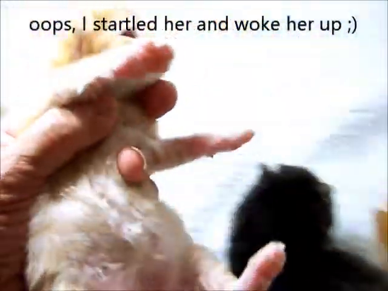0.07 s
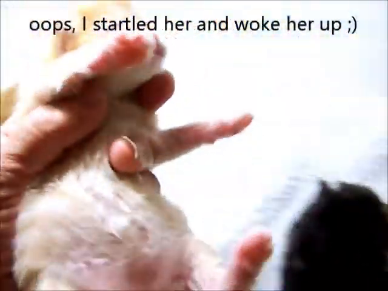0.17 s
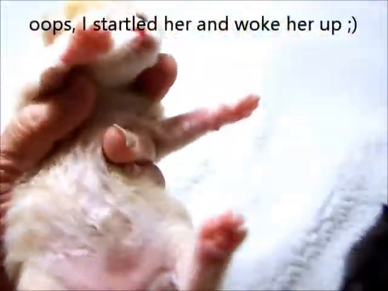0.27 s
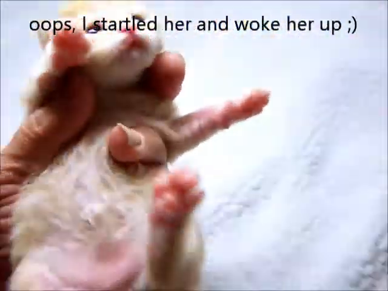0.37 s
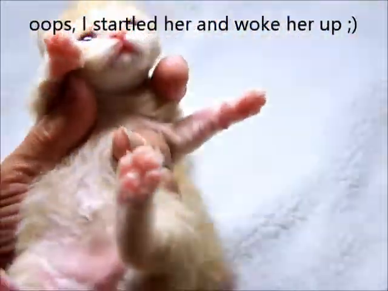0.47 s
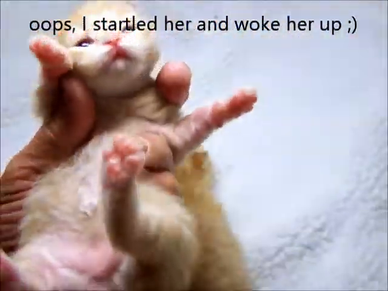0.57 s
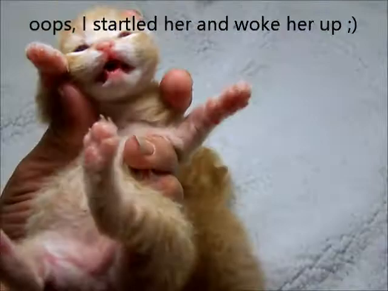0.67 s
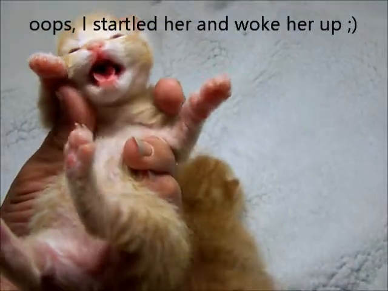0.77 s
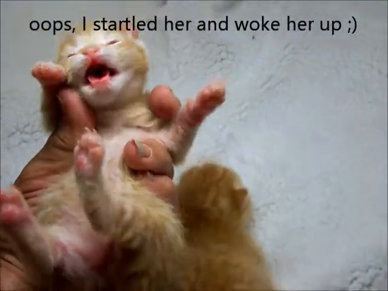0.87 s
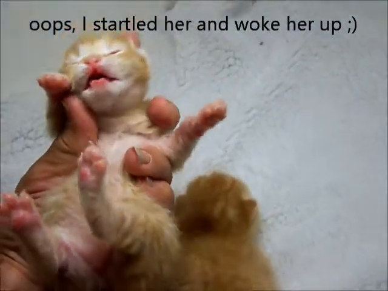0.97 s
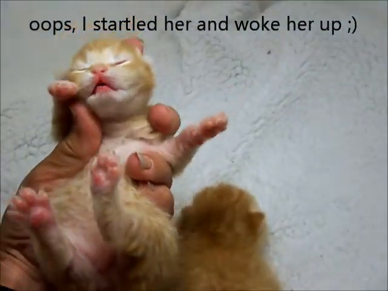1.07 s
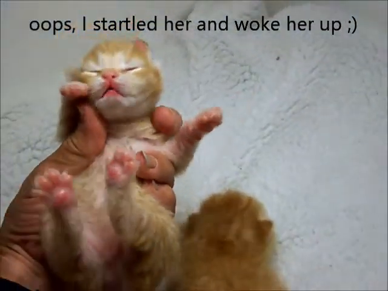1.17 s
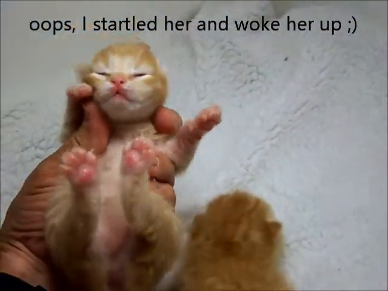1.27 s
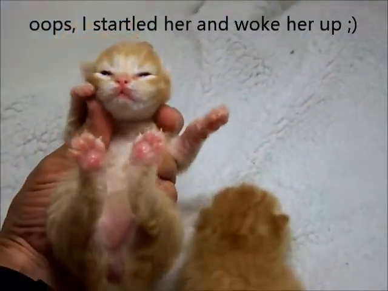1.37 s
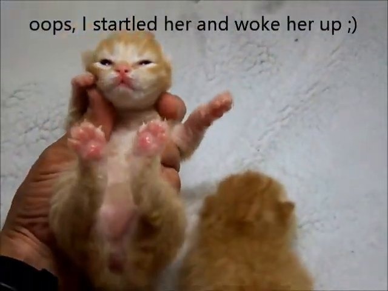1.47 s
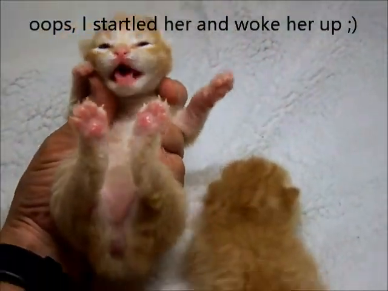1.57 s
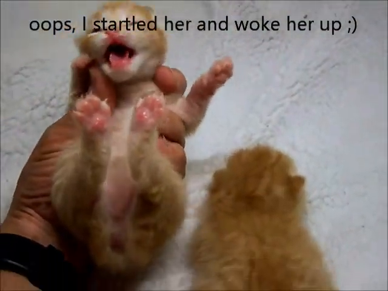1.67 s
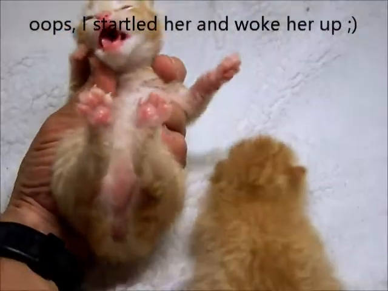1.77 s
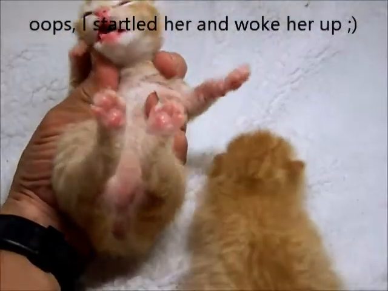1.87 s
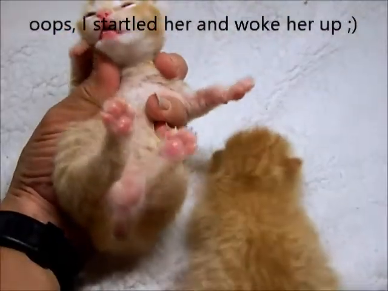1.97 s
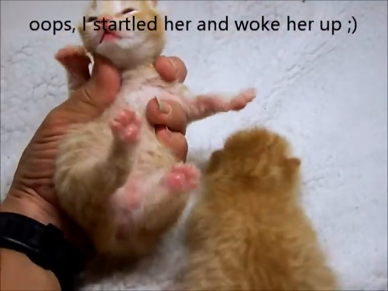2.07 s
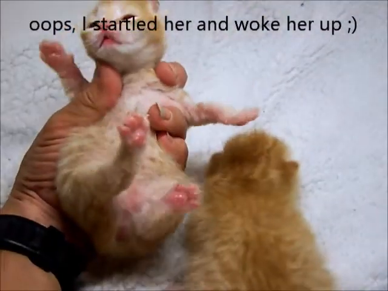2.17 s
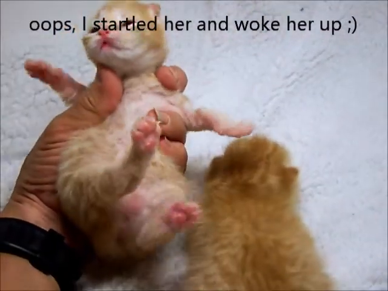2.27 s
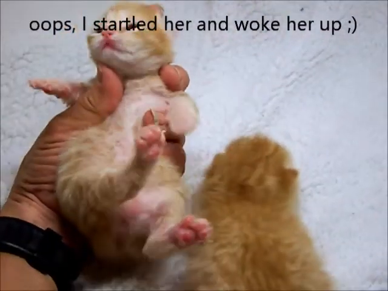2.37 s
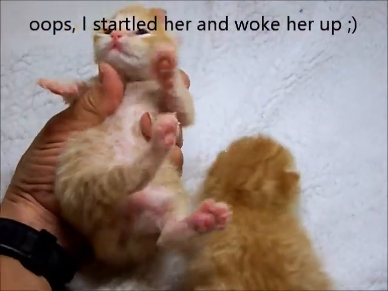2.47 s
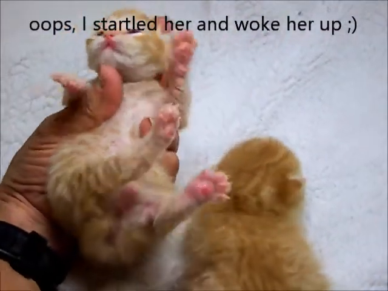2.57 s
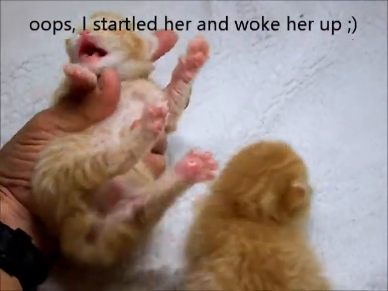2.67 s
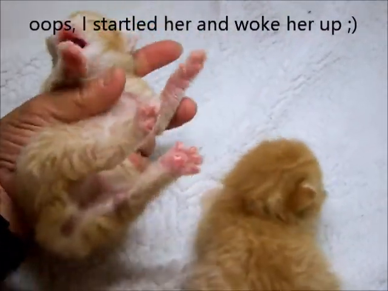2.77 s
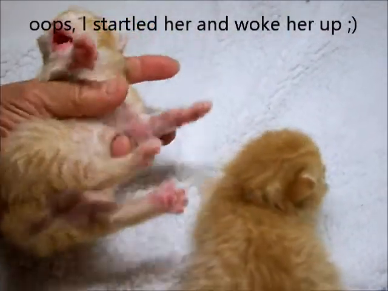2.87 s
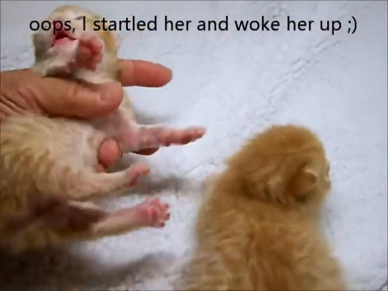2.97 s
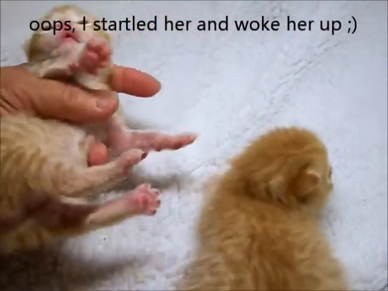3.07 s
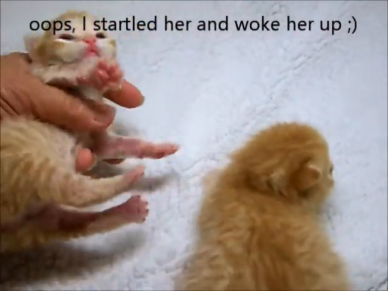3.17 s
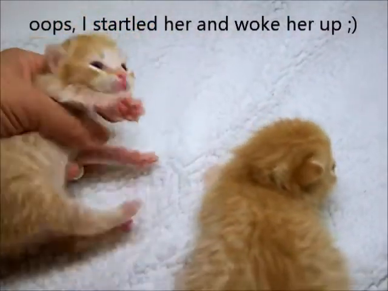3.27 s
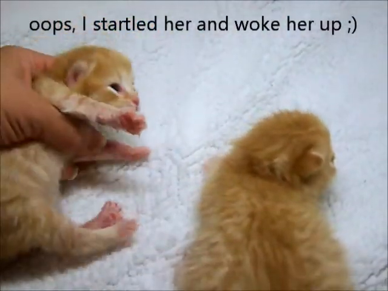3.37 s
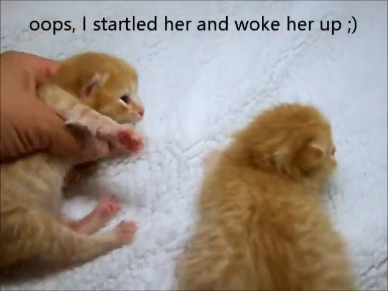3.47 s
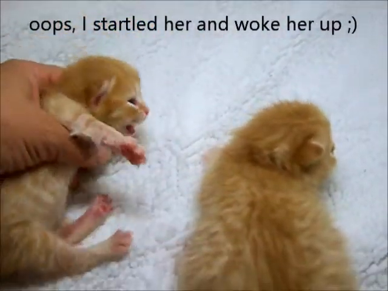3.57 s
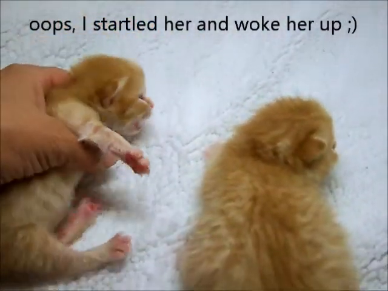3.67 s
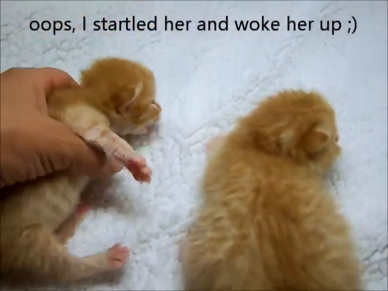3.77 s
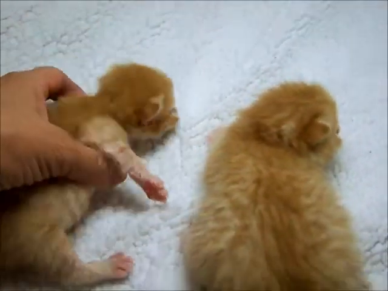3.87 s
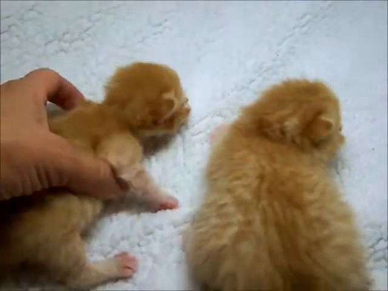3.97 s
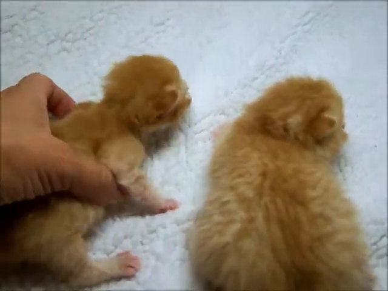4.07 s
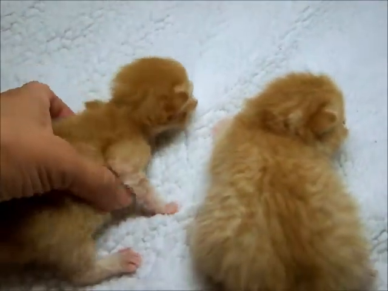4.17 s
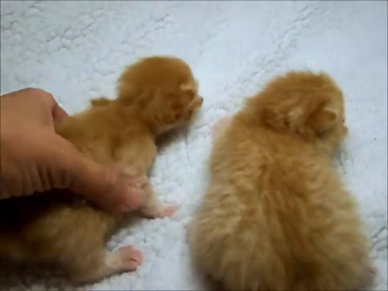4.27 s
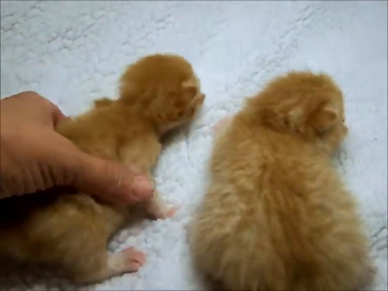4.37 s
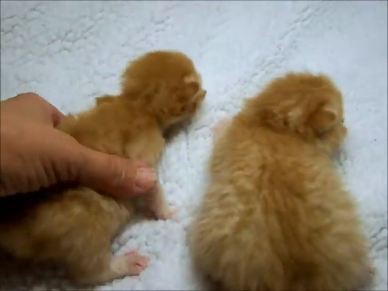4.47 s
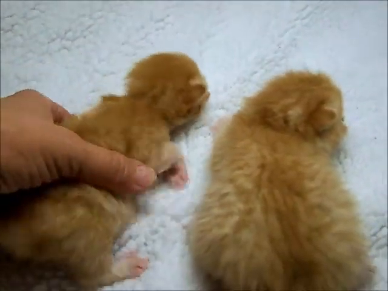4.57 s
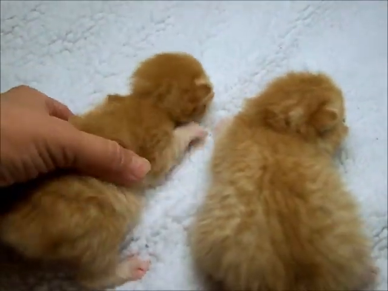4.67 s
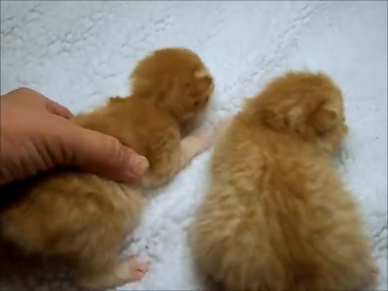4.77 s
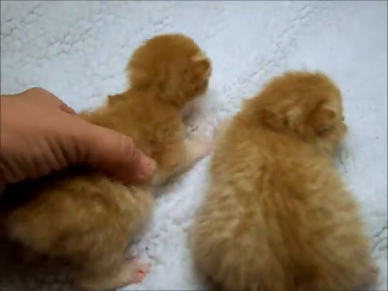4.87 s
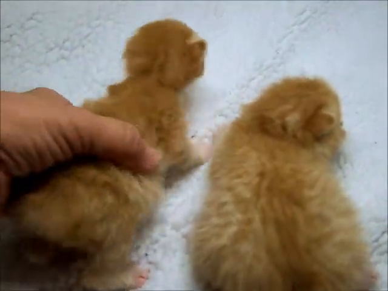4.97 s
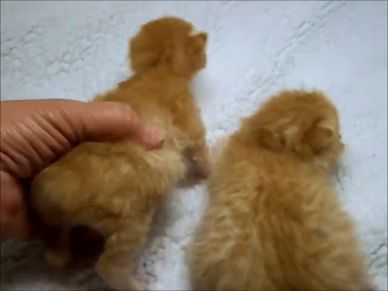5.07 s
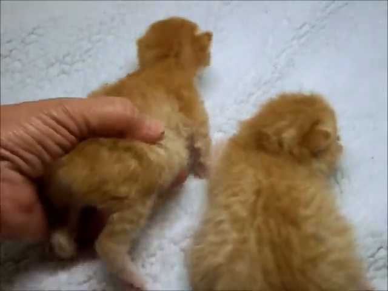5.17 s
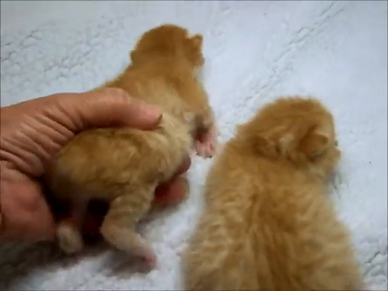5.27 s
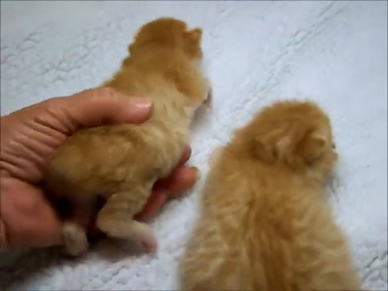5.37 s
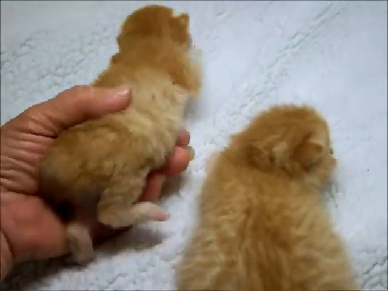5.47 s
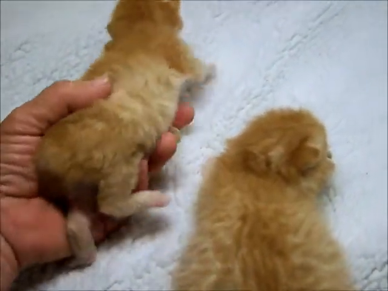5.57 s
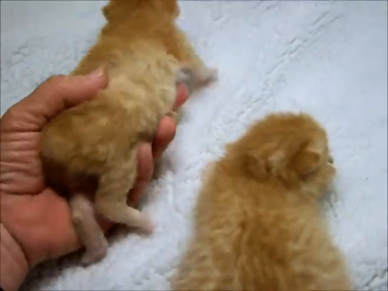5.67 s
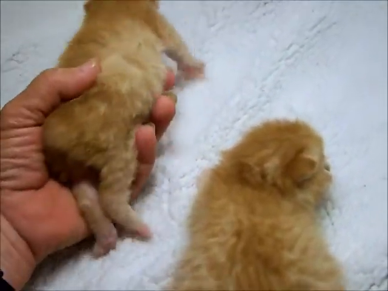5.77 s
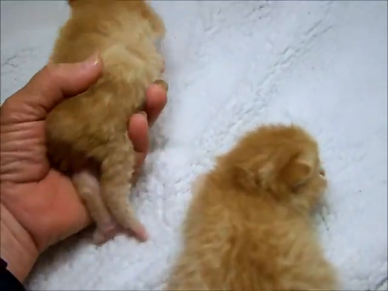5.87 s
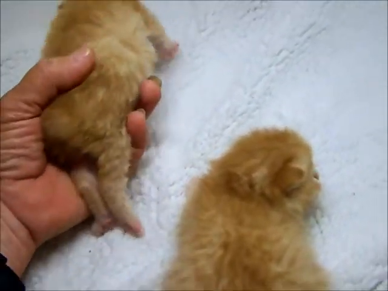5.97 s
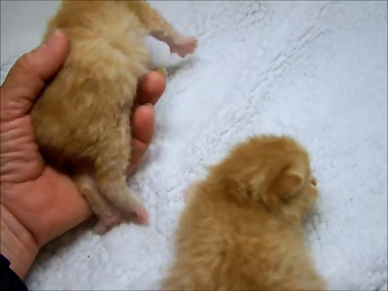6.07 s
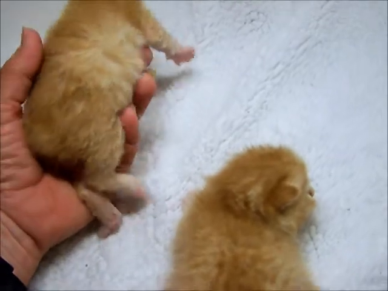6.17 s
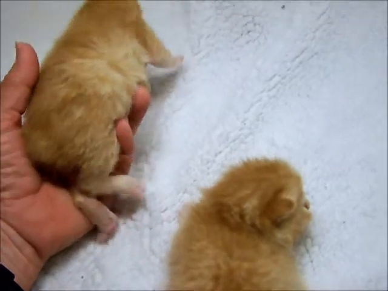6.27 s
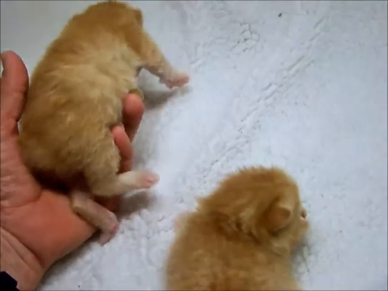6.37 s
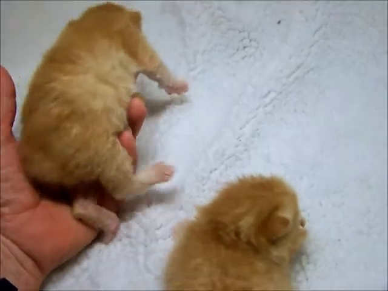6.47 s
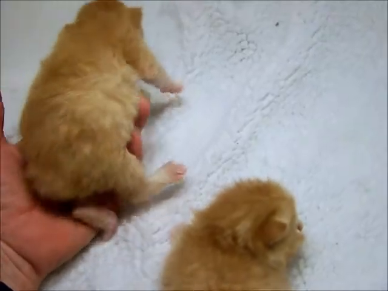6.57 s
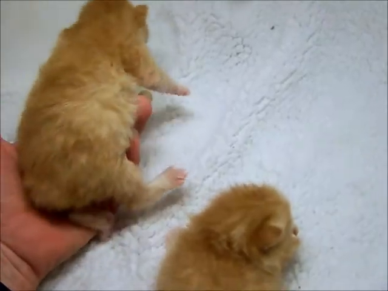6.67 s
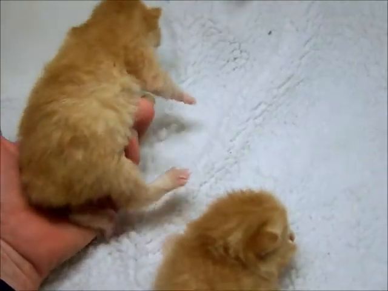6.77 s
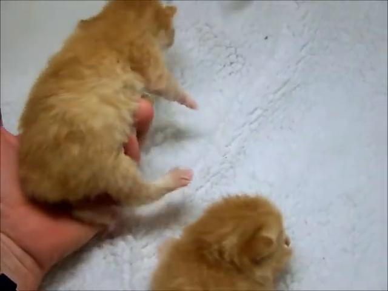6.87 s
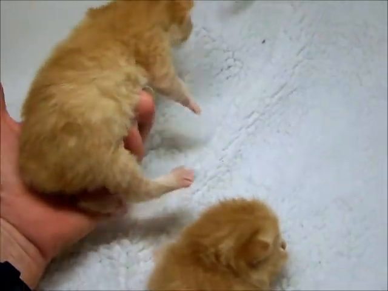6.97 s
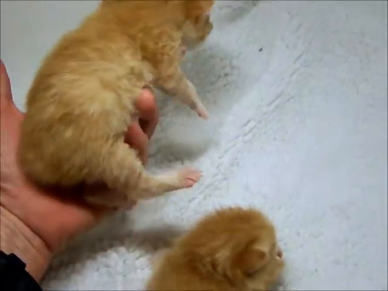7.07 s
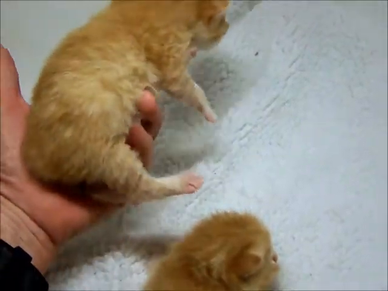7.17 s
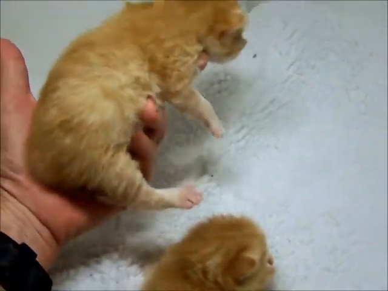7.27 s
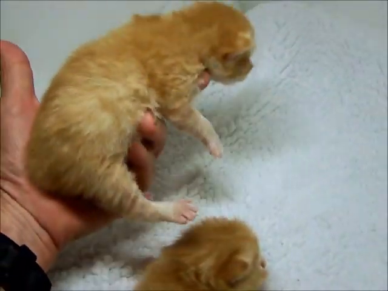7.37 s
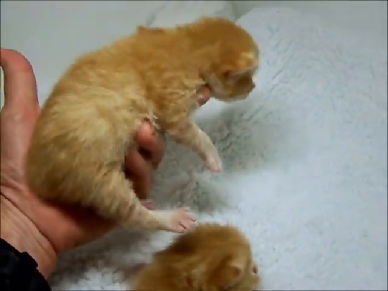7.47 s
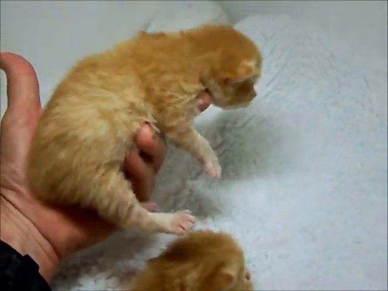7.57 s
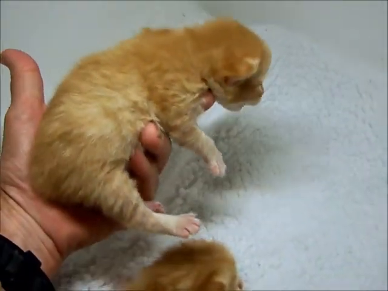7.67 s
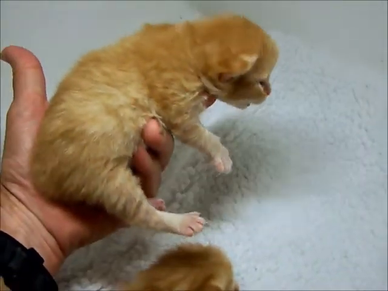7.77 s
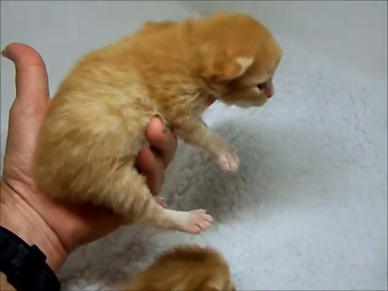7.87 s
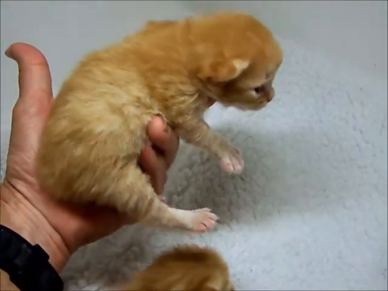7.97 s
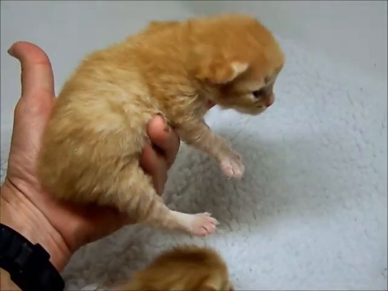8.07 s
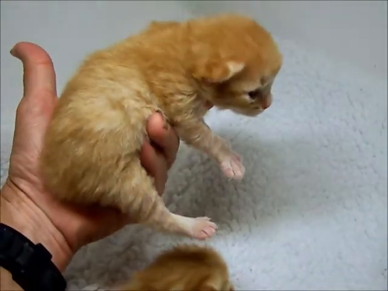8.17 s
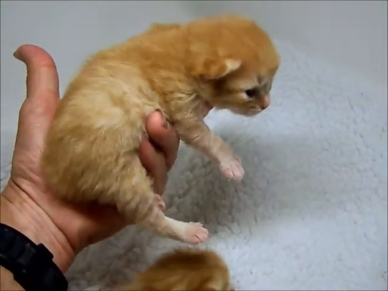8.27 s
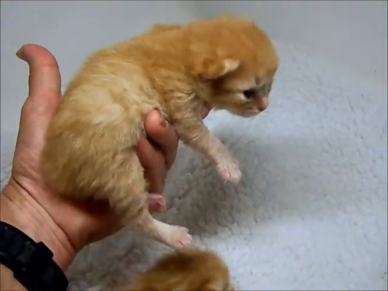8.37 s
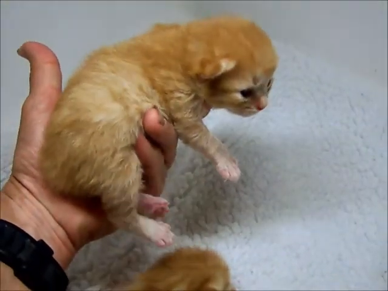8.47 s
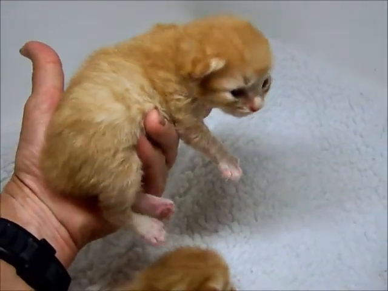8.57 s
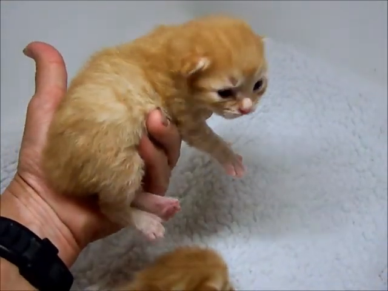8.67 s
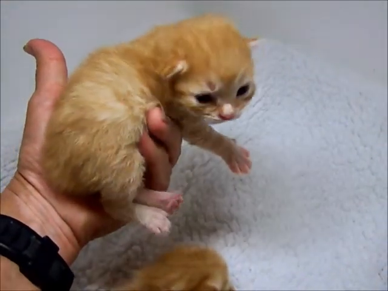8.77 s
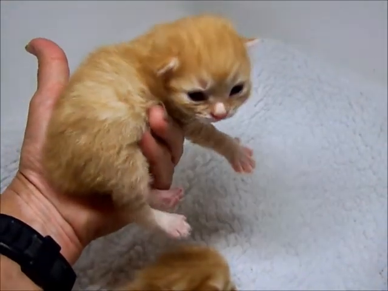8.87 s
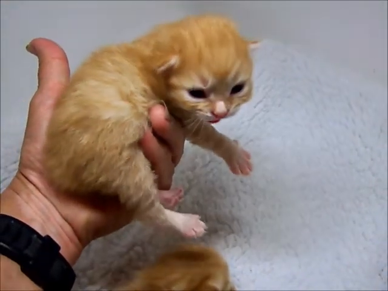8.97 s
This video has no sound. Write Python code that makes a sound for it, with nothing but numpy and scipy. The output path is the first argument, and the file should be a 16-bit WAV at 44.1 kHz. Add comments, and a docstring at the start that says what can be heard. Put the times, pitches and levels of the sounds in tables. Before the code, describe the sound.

A quiet small room with soft hiss and a low throbbing hum. Fur or blanket rustles briefly at 0.1 to 0.35 seconds. A very young kitten, close by, then mews from 0.55 to 1.15: a shrill, very loud squeak that arches up and falls, with a crack and low thud at 0.9 and a lesser one near 1.15. More strong, slightly rough mews follow at 1.45 to 2.2, 2.45 to 3.1 and 3.4 to 4.05, with small wet ticks and throaty rasps at their edges. From 4.2 to 5.9 fabric rubs softly, and a litter mate peeps faintly at 4.6. Weaker mews come at 5.15 to 5.75, 6.45 to 7.1 and 7.4 to 8.1, with distant peeps near 6.9 and 8.0 and a tiny bump at 6.2. A last mew starts at 8.7, still rising when cut off at 9.

```python
"""A very young kitten, close by in a small room, mews eight times in arching squeaks: harmonics of a
gliding pitch are weighted by a sliding throat resonance, with breath noise following their level.
A litter mate answers faintly by the same synthesis. Noise bursts tick, decaying cracks and thuds bump,
and grainy coloured noise rustles and rasps, over shaped hiss and a throbbing hum."""
import sys
import numpy as np
from scipy import signal
from scipy.fft import rfft, irfft
from scipy.io import wavfile
from scipy.ndimage import uniform_filter1d

SR = 44100
rng = np.random.default_rng(int(sys.argv[2]) if len(sys.argv) > 2 else 0)


def wav_out(sig):
    """Save sig, one row per channel (or a flat mono array), as 16-bit PCM at SR to the path in sys.argv[1]."""
    wavfile.write(sys.argv[1], SR, np.round(np.clip(np.atleast_2d(sig).T, -1, 1) * 32767).astype(np.int16))


N = 397782  # samples, about 9 s


def amp(db):
    """Level law: 20 dB is a factor of ten in amplitude."""
    return 10 ** (np.asarray(db) / 20)


def evened(x):
    """Normalisation to an rms of one."""
    return x / np.sqrt(np.mean(x ** 2) + 1e-20)


def read(points, hz):
    """Interpolation along a logarithmic frequency axis."""
    f, value = np.transpose(points)
    return np.interp(np.log(hz + 1), np.log(f + 1), value)


def add(mix, s, sound):
    """Superposition: sounds sum where they overlap, starting at s seconds."""
    part = mix[round(s * SR):][:len(sound)]
    part += sound[:len(part)]


def coloured(x, points):
    """Linear filtering: each frequency is scaled by a curve of (Hz, dB) points."""
    gain = amp(read(points, np.fft.rfftfreq(len(x), 1 / SR)))
    return irfft(rfft(x) * gain, len(x))


def drift(size, span_s):
    """Low-pass random process: twice averaged noise of rms one varies over about span_s seconds."""
    span = max(int(span_s * SR), 2)
    smoothed = uniform_filter1d(rng.standard_normal(size), span)
    return evened(uniform_filter1d(smoothed, span))


def bell(x, half):
    """Gaussian window: one at the centre, 1/e at a distance of half."""
    return np.exp(-(x / half) ** 2)


# Spectrum of the hiss. Each row: frequency in Hz, relative density in dB per Hz.
HISS_SPECTRUM = [(15, -4), (30, -17.5), (80, -16.5), (150, -17), (250, -23.5), (450, -25), (700, -28),
                 (1500, -31), (2500, -31.5), (3550, -29.5), (5000, -35.5), (7400, -38.5), (9000, -45.5)]


def hiss():
    """Shaped random noise: complex noise cells, weighted by a spectrum, with faint patches of level."""
    frames, hz = N // 256 + 5, np.fft.rfftfreq(1024, 1 / SR)
    real, imaginary, patches, swell = rng.standard_normal((frames, 513, 4)).T
    patches = uniform_filter1d(patches, 14, 0)  # across frequency
    patches = evened(uniform_filter1d(patches, 12, 1))  # across time
    swell = evened(uniform_filter1d(swell[0], 20))
    level_db = read(HISS_SPECTRUM, hz)[:, None] + patches + 0.35 * swell
    cells = (real + 1j * imaginary) * amp(level_db)
    noise = signal.istft(cells, nperseg=1024, noverlap=768)[1][:N]
    return amp(-59.5) * evened(noise)


# Narrow hum lines. Each row: frequency in Hz, nominal level in dB, nominal line width in Hz.
HUM_LINES = [(60, -60, 6), (115.2, -64.5, 7.), (238, -77.5, 4.)]


def hum():
    """Narrow-band noise: slow random modulation of two quadratures broadens each line, so it throbs."""
    out, t = np.zeros(N), np.arange(N) / SR
    for line_hz, db, width_hz in HUM_LINES:
        turn = 2 * np.pi * line_hz * t
        span_s = 0.31 / width_hz
        in_phase = (0.62 + drift(N, span_s)) * np.cos(turn)
        quadrature = drift(N, span_s) * np.sin(turn)
        out += amp(db) * (in_phase + quadrature)
    return out


# Decay of the room by frequency. Each row: frequency in Hz, time to fall by 60 dB in seconds.
ROOM_DECAY = [(500, .35), (1200, .17), (3300, .24), (7000, .15)]


def room(x):
    """Reverberation as convolution: sparse taps of random sign, each band decaying at its own rate."""
    taps = np.zeros(SR // 2)
    at = np.arange(200, len(taps) - 20, 20)
    taps[at + rng.integers(0, 20, len(at))] = rng.choice([-1., 1.], len(at))
    hz, t, z = signal.stft(taps, SR, nperseg=256)
    decay = amp(-60 * t / read(ROOM_DECAY, hz)[:, None])
    tail = signal.istft(z * decay, SR, nperseg=256)[1]
    return signal.fftconvolve(x, tail / np.linalg.norm(tail))[:N]


def puffs(rows, colour, grain_db):
    """Friction noise: fast random modulation makes noise grainy, and a tapered window swells it."""
    out = np.zeros(N)
    for s, length_s, db in rows:
        size = round(length_s * SR)
        grains = rng.standard_normal(size) * amp(grain_db * drift(size, 0.0012))
        noise = evened(coloured(grains, colour))
        add(out, s, amp(db) * noise * signal.windows.tukey(size, .6))
    return out


# Fur and blanket rubbed. Each row: start in seconds, length in seconds, rms level in dB before the taper.
RUBS = [(0.105, 0.053, -63.5), (.245, 0.11, -53.5), (.35, 0.17, -81.5), (4.2, 0.49, -66),
        (4.6, 0.21, -68.5), (4.82, 0.19, -59), (5.05, 0.28, -62), (5.496, 0.28, -62), (5.85, 0.1, -66)]
# Colour of the rubbing. Each row: frequency in Hz, relative level in dB.
RUB_COLOUR = [(300, -34), (1000, -8), (2000, -6), (3000, -4), (3800, 0.5), (4800, -16), (7500, -31.5)]


def rustles():
    """Sliding friction: fur and blanket rub as grainy coloured noise."""
    return puffs(RUBS, RUB_COLOUR, grain_db=3)


# Knocks. Each row: start in seconds, crack level in dB, crack 60 dB decay time in seconds,
# thud peak level in dB, thud frequency in Hz, thud 60 dB decay time in seconds.
KNOCKS = [(.883, -30, 0.21, -27, 116.7, 0.14), (1.167, -40.5, 0.19, -30, 101.3, .1),
          (4.212, -80, .05, -54, 700, .12), (6.175, -80, .05, -52, 480, .1)]


def bumps():
    """Impact excitation: a broadband crack and a low sine thud decay exponentially from one onset."""
    out, t = np.zeros(N), np.arange(SR // 4) / SR
    crack_colour = [(200, 0.5), (1500, -7.5), (3300, -1.0), (7000, -22)]  # (Hz, dB)
    for s, crack_db, crack_t60, thud_db, thud_hz, thud_t60 in KNOCKS:
        crack = evened(coloured(rng.standard_normal(len(t)), crack_colour))
        thud = np.sin(2 * np.pi * thud_hz * t)
        add(out, s, amp(crack_db - 60 * t / crack_t60) * crack)
        add(out, s, amp(thud_db - 60 * t / thud_t60) * thud)
    return out


# Lips, tongue and claws tick. Each row: start in seconds, approximate peak level in dB, centre in Hz.
CLICKS = [(0.6305, -31, 4830), (1.1478, -31, 2150), (2.0947, -37, 3010), (2.3294, -50, 4800),
          (3.0044, -43, 3030), (3.0318, -33, 2370), (4.016, -44.5, 2370), (7.5732, -44, 3150),
          (8.0677, -45.5, 2390), (8.9, -41, 3130), (4.67, -43, 3700), (4.8295, -50, 2500),
          (6.0794, -48, 4500), (6.1959, -49, 3000), (6.622, -44, 3015), (7.105, -44, 2400)]


def ticks():
    """Transient excitation: band-centred noise bursts fall by 60 dB in 30 ms."""
    out, t = np.zeros(N), np.arange(SR // 4) / SR
    for s, peak_db, hz in CLICKS:
        colour = [(hz / 5, -20), (hz, 0), (hz * 1.6, -20)]
        burst = evened(coloured(rng.standard_normal(len(t)), colour))
        add(out, s, amp(peak_db - 7 - 60 * t / 0.03) * burst)  # rms starts 7 dB under the peak
    return out


# Faint calls of a litter mate, a list of rows for each. Each row: time in seconds, pitch in Hz,
# fundamental rms level in dB, upper harmonics over the fundamental in dB, throat peak in Hz.
LITTER_MATE_CALLS = [
    [(4.565, 830, -85, 8.7, 2400), (4.585, 852, -67.5, 12.3, 2400), (4.625, 790, -85, 9.1, 2400)],
    [(6.845, 750, -80, 15, 3200), (6.875, 762, -70, 8.9, 3200), (6.92, 793, -65, 6.6, 1950),
     (7.0, 856, -80, 17.5, 1797), (7.055, 780, -90.5, 18, 1700)],
    [(7.87, 932, -58, -5, 4190), (7.89, 922, -61.5, 13, 4250), (7.946, 966, -61.5, 9.5, 4400),
     (8.0, 1025, -61.5, -0.5, 4200), (8.05, 1052, -58, -4, 4000), (8.18, 1040, -69, -11.5, 2211)],
]


def answers():
    """Source-filter voice: a litter mate further off calls with a less steady pitch."""
    out = np.zeros(N)
    for rows in LITTER_MATE_CALLS:
        add(out, *mew(rows, waver=.013, flutter_db=1.2, creak_db=0))
    return out


# Air rasps in the throat. Each row: start in seconds, length in seconds, rms level in dB before the taper.
THROAT_RASPS = [(1.455, 0.032, -59), (2.06, 0.037, -58), (2.435, 0.026, -62.5), (3.03, 0.036, -51),
                (3.445, 0.076, -39), (3.96, .03, -59.5), (6.44, 0.026, -64.5), (6.71, .1, -63.5),
                (.535, 0.039, -56.5)]
# Colour of the rasping. Each row: frequency in Hz, relative level in dB.
RASP_COLOUR = [(1500, -36), (2600, -16), (3200, -5), (3800, 0), (4500, -6), (5200, -20), (7500, -32)]


def rasps():
    """Turbulence: air rasps through the kitten's throat as grainy coloured noise."""
    return puffs(THROAT_RASPS, RASP_COLOUR, grain_db=2)


# Pitch sags under strain. Each row: time in seconds, share of the pitch, half length in seconds.
PITCH_SAGS = [(1.556, .03, .012), (2.735, .025, .012)]


def sagged(hz, t):
    """Frequency modulation: the pitch sags for a moment under strain."""
    for at, share, half_s in PITCH_SAGS:
        hz = hz * (1 - share * bell(t - at, half_s))
    return hz


# Brief level changes of the voice, mostly dips. Each row: time in seconds, level change in dB.
VOICE_BREAKS = [(0.631, -25), (0.979, -9), (2.151, -5), (2.596, -6), (3.032, -7), (4.017, -18), (5.24, 5),
                (5.58, -12), (5.69, -8), (6.612, -10.5), (8.899, -0.5)]


def broken(level_db, t):
    """Amplitude modulation: the voice level changes briefly, mostly breaking off."""
    for at, change_db in VOICE_BREAKS:
        level_db = level_db + change_db * bell(t - at, .004)
    return level_db


# Rough moments of the upper harmonics. Each row: time in seconds, half length in seconds, flicker in dB.
ROUGH_MOMENTS = [(1.49, .03, 2), (2.12, .04, 3), (2.67, .07, 3), (3.05, .03, 4), (7.95, .1, 3),
                 (5.65, .07, 3), (1.08, .08, 2)]


def roughness(t):
    """Roughness: the depth in dB of fast flicker rises and falls around each strained moment."""
    return sum(db * bell(t - at, half_s) for at, half_s, db in ROUGH_MOMENTS)


# Throat resonance with its peak at rest. Each row: frequency in Hz, level in dB.
THROAT_CURVE = [(1050, -8.5), (1750, -8.5), (2450, -7), (2975, -1), (3500, -1), (4025, -17), (4550, -20.5),
                (5250, -23.5), (6300, -29), (7700, -45.5)]
THROAT_REST_HZ = 3500
# The throat tunes to one harmonic. Each row: time in seconds, frequency in Hz, gain in dB,
# half length in seconds.
TUNED_SWELLS = [(0.704, 3700, 12.5, 0.018), (1.525, 4500, 9.5, 0.0076), (1.563, 4700, 11.5, 0.018),
                (1.652, 3450, 7.5, .012), (2.731, 3200, 11.8, .016), (3.544, 3650, 13, 0.019),
                (8.931, 3230, 9.5, 0.0064), (8.982, 3550, 7, 0.033)]


def throat_db(harmonic_hz, peak_hz):
    """Resonance: the response curve slides along frequency as a whole with its peak."""
    return read(THROAT_CURVE, harmonic_hz * THROAT_REST_HZ / peak_hz)


def tuned_db(harmonic_hz, t):
    """Formant tuning: harmonics near the tuned frequency swell briefly."""
    return sum(gain_db * bell(t - at, half_s) * bell(harmonic_hz - tuned_hz, 600)
               for at, tuned_hz, gain_db, half_s in TUNED_SWELLS)


def mew(rows, waver, flutter_db, creak_db, breath_db=-38):
    """Source-filter principle: vocal fold harmonics pass the throat, and breath noise follows effort."""
    s, *columns = np.transpose(rows)
    t = np.arange(s[0], s[-1], 1 / SR)
    hz, level_db, mouth_db, peak_hz = (uniform_filter1d(np.interp(t, s, c), size=150) for c in columns)
    hz, level_db = sagged(hz, t), broken(level_db, t)
    turns = np.cumsum(hz * (1 + waver * drift(len(t), 0.014))) / SR
    slack = np.clip((1150 - hz) / 350, 0, 1)  # slack folds at low pitch creak unevenly
    rough_db = roughness(t)
    voice, power = np.zeros(len(t)), np.zeros(len(t))
    for k in range(1, 10):
        db = level_db + tuned_db(k * hz, t)
        if k > 1:
            db = db + mouth_db + creak_db * slack + throat_db(k * hz, peak_hz)
        flicker_db = flutter_db * np.sqrt(k) + .35 * creak_db * slack
        db = db + flicker_db * drift(len(t), .006)
        if k > 2:
            db = db + rough_db * drift(len(t), .0025)
        size = amp(db)
        voice += np.sqrt(2) * size * np.sin(2 * np.pi * (k * turns + rng.random()))
        power += size ** 2
    breath_colour = [(300, -6.5), (3400, -5.5), (7500, -16.5)]  # (Hz, dB)
    breath = evened(coloured(rng.standard_normal(len(t)), breath_colour))
    voice += amp(breath_db) * np.sqrt(power) * breath
    fade = np.clip(np.minimum(t - s[0], s[-1] - t) / .003, 0, 1)
    return s[0], voice * fade


# The kitten's eight mews, a list of rows for each. Each row: time in seconds, pitch in Hz,
# fundamental rms level in dB before brief changes, mouth opening as the dB of the upper
# harmonics over the fundamental, throat peak in Hz.
KITTEN_MEWS = [
    [(0.545, 632, -65, 0.5, 3900), (0.567, 742, -64, 8.5, 4050), (0.615, 1296, -49.5, 2, 4100),
     (0.634, 1517, -52.5, 14, 7250), (0.693, 1797, -46.5, 22, 4740), (0.755, 1995, -36, 12, 5230),
     (0.797, 2035, -35.5, 12.5, 5460), (0.849, 2014, -27, -1.5, 5470), (0.925, 1948, -22, -10, 5200),
     (0.999, 1900, -26.5, -17, 3970), (1.061, 1842, -35, -16.5, 5240), (1.125, 1595, -52, 2.5, 3220),
     (1.17, 1028, -37.5, -19, 4190)],
    [(1.452, 772, -74, 1, 4287), (1.462, 840, -64.5, 6, 3000), (1.483, 1046, -50.5, 13.5, 2200),
     (1.507, 1396, -45.5, 19.5, 4010), (1.53, 1528, -50.5, 29, 4770), (1.571, 1615, -54, 38, 5980),
     (1.627, 1714, -46.5, 35.5, 4020), (1.707, 1753, -42, 26, 4480), (1.93, 1617, -43, 7.5, 4720),
     (1.955, 1650, -35.5, -7.5, 4700), (2.02, 1660, -44, -14, 4185), (2.088, 1422, -52, -10, 3400),
     (2.1, 1545, -48.5, -7.5, 4040), (2.145, 1466, -35, -8.5, 2988), (2.151, 1178, -28.5, -7.5, 2450),
     (2.19, 1050, -60.5, -12, 4170)],
    [(2.44, 656, -79, 0, 3983), (2.47, 772, -68, 12, 3186), (2.498, 918, -66.5, 14.5, 4034),
     (2.544, 1180, -46, 3, 2503), (2.595, 1435, -43, 21.5, 4030), (2.653, 1566, -49.5, 32.5, 4400),
     (2.715, 1611, -42, 32, 3810), (2.815, 1685, -36.5, 9.5, 4488), (2.883, 1707, -39, 0, 4690),
     (2.951, 1642, -35, -1.5, 4577), (3.0, 1551, -41, 3, 4060), (3.029, 1400, -36.5, -2.5, 3910),
     (3.035, 1197, -29, -1, 3550), (3.08, 1114, -63, -33.5, 4315)],
    [(3.37, 680, -77.5, -6.5, 3900), (3.395, 906, -65, 12, 2424), (3.428, 1255, -60, 21.5, 3130),
     (3.482, 1568, -57, 27, 4810), (3.538, 1836, -51, 30.5, 3660), (3.56, 1854, -53.5, 30, 3710),
     (3.678, 1797, -37, 13, 3580), (3.746, 1722, -37, -7.5, 3860), (3.856, 1566, -32, -13.5, 3400),
     (3.966, 1476, -40, -28, 3610), (4.016, 1310, -51.5, -12.5, 2390), (4.021, 1153, -33.5, -35.5, 3890),
     (4.05, 1180, -70, -14, 3880)],
    [(5.13, 1168, -83, 9, 3905), (5.162, 1266, -55, -6, 3540), (5.226, 1456, -52, -4.5, 4080),
     (5.245, 1572, -69, 33.5, 3990), (5.298, 1698, -55, 23.5, 3910), (5.352, 1787, -46, 16.5, 3635),
     (5.388, 1810, -47, 6.5, 3900), (5.472, 1713, -53.5, 3.5, 4480), (5.624, 1549, -53, -9.5, 3766),
     (5.704, 1360, -67, -1.5, 2794), (5.74, 1330, -77, -10, 3490)],
    [(6.46, 568, -76, 7, 3610), (6.5, 863, -67, 2, 3860), (6.542, 1186, -59, 4, 2750),
     (6.59, 1430, -60.5, 0.5, 2990), (6.628, 1526, -61, 15.5, 3890), (6.722, 1538, -60, 19, 3542),
     (6.836, 1463, -55.5, 8.5, 2870), (6.948, 1307, -52, -5, 3740), (7.016, 1197, -55, -9.5, 2998),
     (7.104, 970, -65, -4, 2890), (7.12, 945, -78, -2.5, 4460)],
    [(7.41, 567, -80, -3.5, 4030), (7.44, 766, -75, 10.5, 3570), (7.482, 1086, -62.5, 11.5, 2490),
     (7.526, 1366, -45.5, -17.5, 2757), (7.608, 1644, -69, 40, 3750), (7.686, 1743, -47.5, 16, 3690),
     (7.798, 1710, -51, 6.5, 3530), (7.896, 1543, -46, 0, 3910), (7.938, 1478, -39, -12.5, 3920),
     (7.998, 1388, -42.5, -14, 2700), (8.07, 1164, -51.5, -6, 3000), (8.084, 1140, -47.5, -22, 3470),
     (8.1, 1010, -82, 6, 2870)],
    [(8.675, 553, -72, 6, 3790), (8.69, 606, -68.5, 4.5, 2600), (8.714, 735, -63.5, 5, 2984),
     (8.762, 906, -60, 2.5, 3650), (8.814, 1068, -55.5, 6, 3197), (8.878, 1426, -46, 2, 2520),
     (8.9, 1514, -56.5, 17.5, 3057), (8.924, 1574, -52.5, 20.5, 3360), (8.962, 1710, -49, 27, 4030),
     (8.99, 1770, -52, 33.5, 3600), (9.02, 1845, -55, 19.5, 3800)],
]


def kitten():
    """Source-filter voice: the near kitten mews with a steady pitch that creaks when low."""
    out = np.zeros(N)
    for rows in KITTEN_MEWS:
        add(out, *mew(rows, waver=.002, flutter_db=.68, creak_db=3))
    return out


def scene():
    """Superposition: near and far sources, their reverberation and the background sum in one channel."""
    near = rustles() + bumps() + ticks() + rasps() + kitten()
    far = answers()
    reverberation = room(amp(-13.5) * near + amp(-32) * far)
    return (near + far + reverberation + hiss() + hum())[None]


def record(dry):
    """Envelope limiting near full scale, then a small constant offset and a low-pass band limit."""
    envelope = uniform_filter1d(abs(signal.hilbert(dry)), 40)
    held = dry / np.maximum(envelope / .978, 1) + .0041
    lowpass = signal.firwin(301, 7600, window=("kaiser", 8), fs=SR)  # cutoff in Hz
    return signal.oaconvolve(held, lowpass[None], "same")


dry = scene()
out = record(dry)
wav_out(out)
```